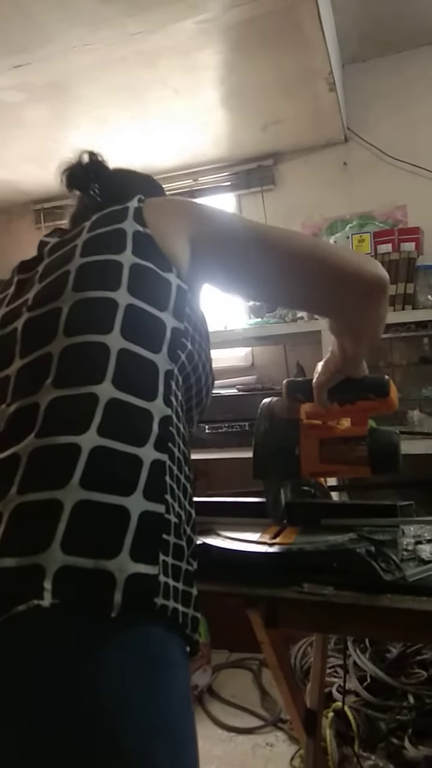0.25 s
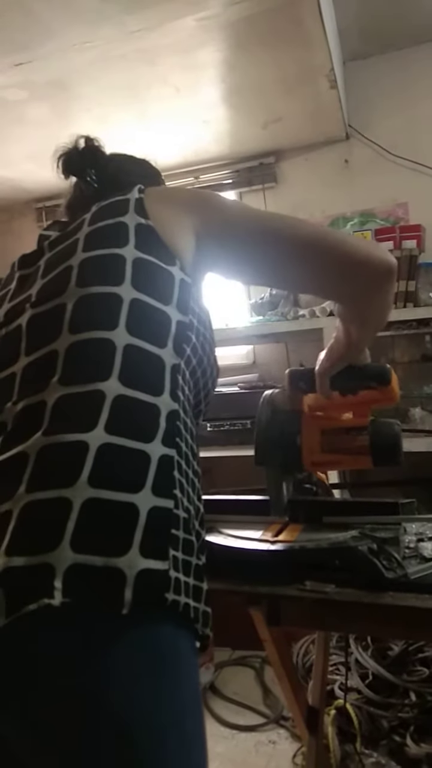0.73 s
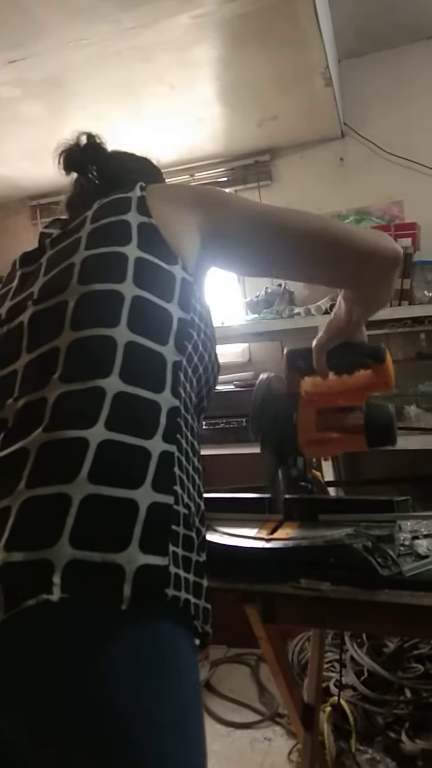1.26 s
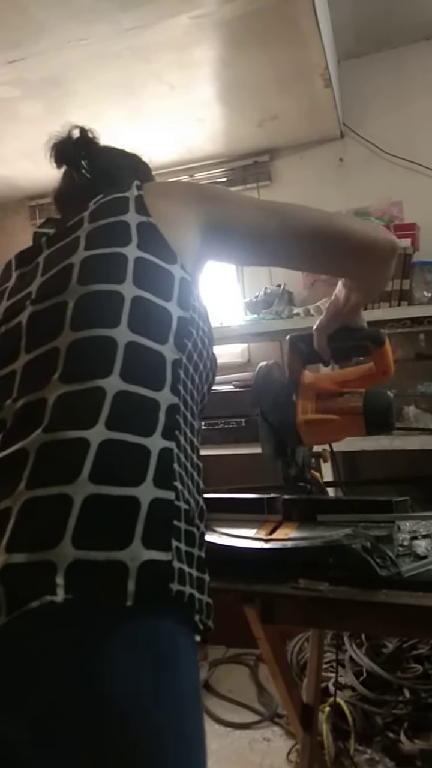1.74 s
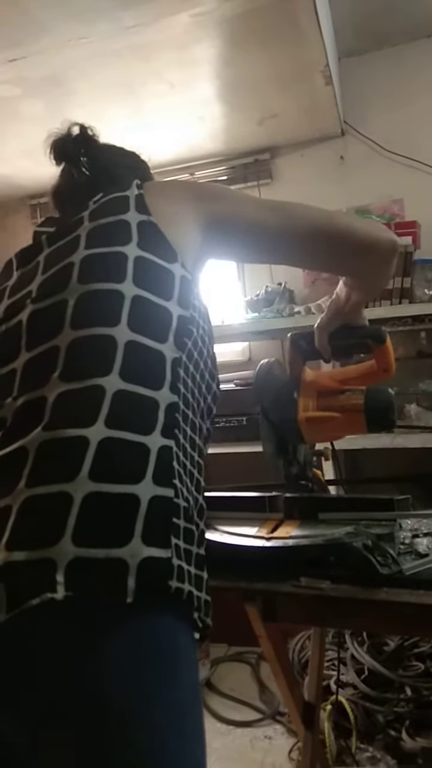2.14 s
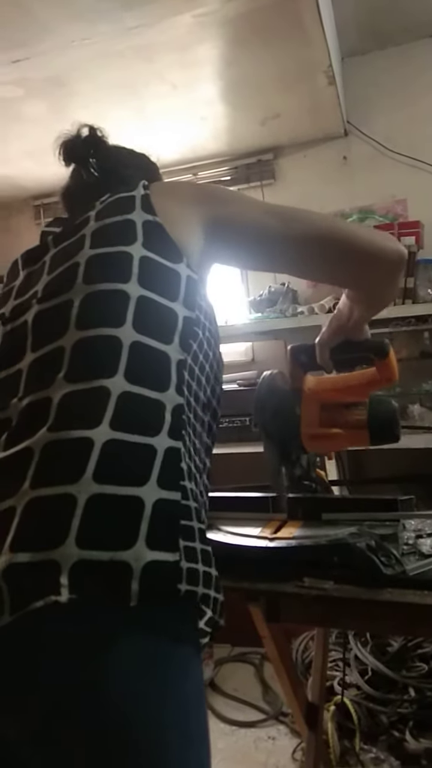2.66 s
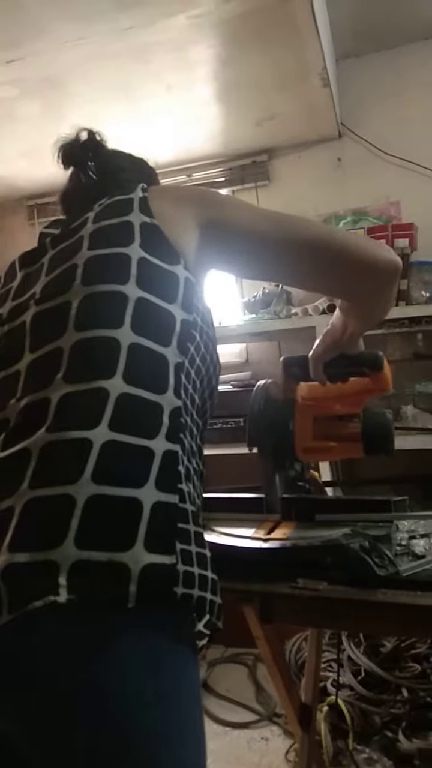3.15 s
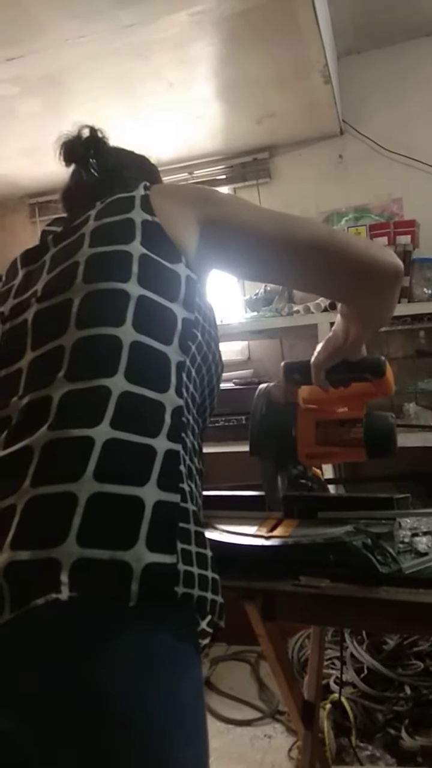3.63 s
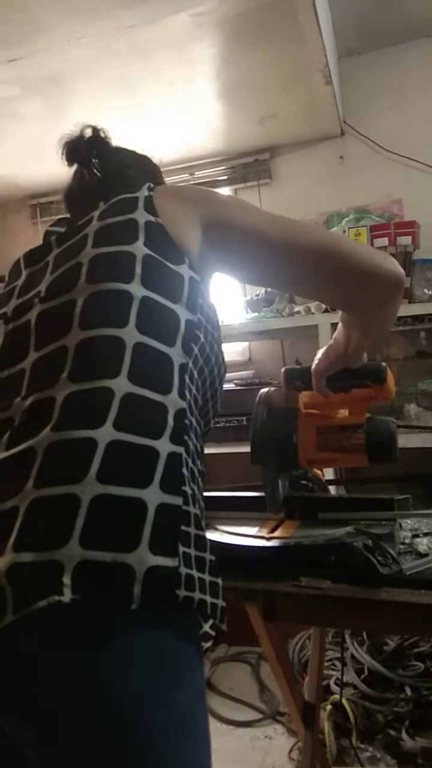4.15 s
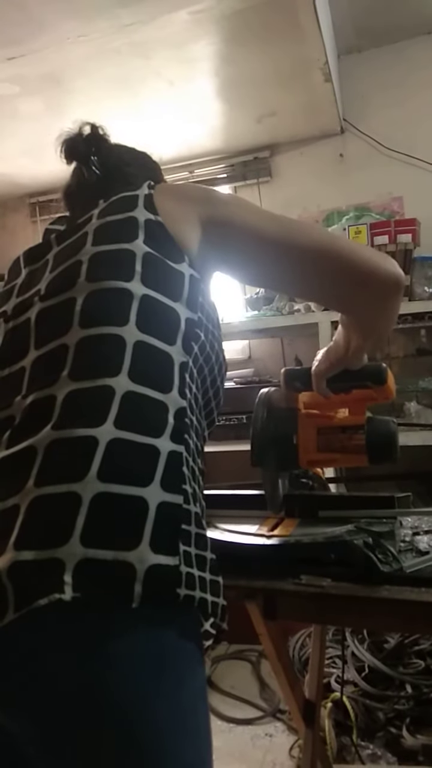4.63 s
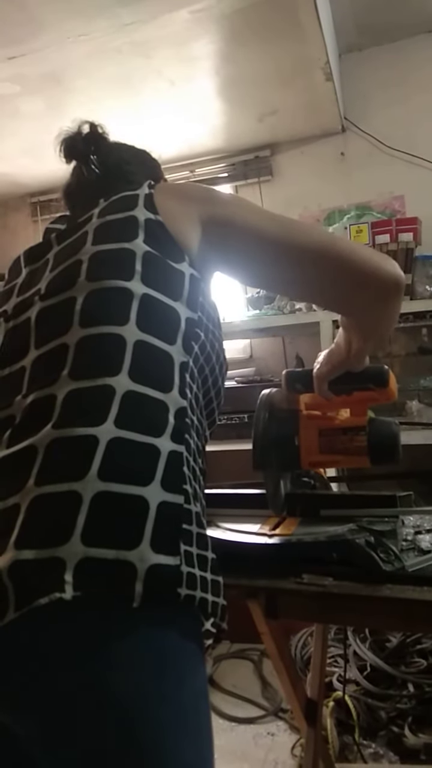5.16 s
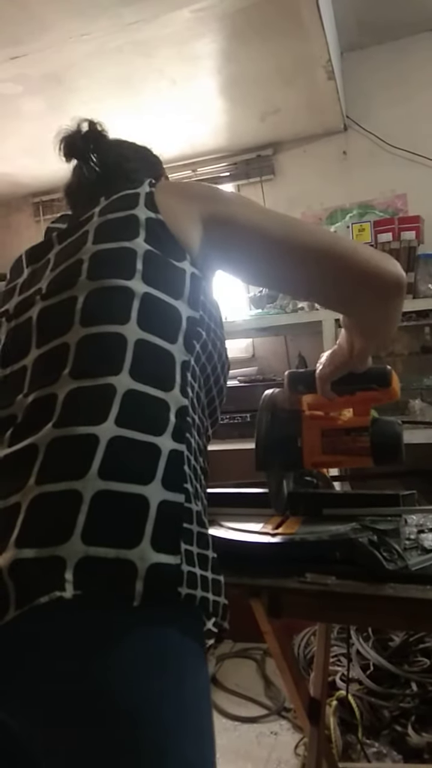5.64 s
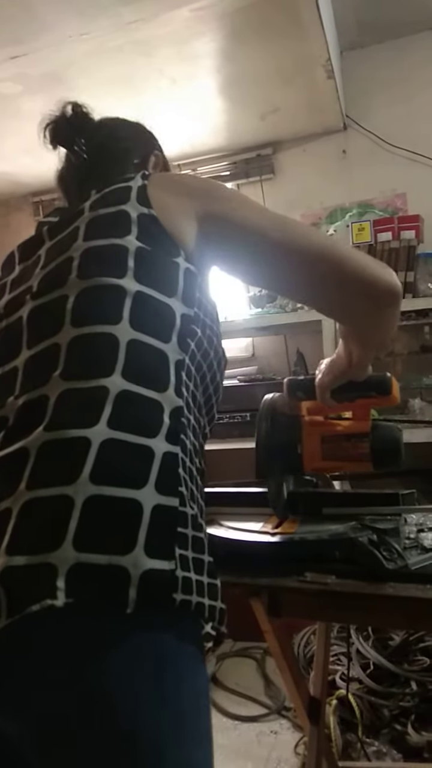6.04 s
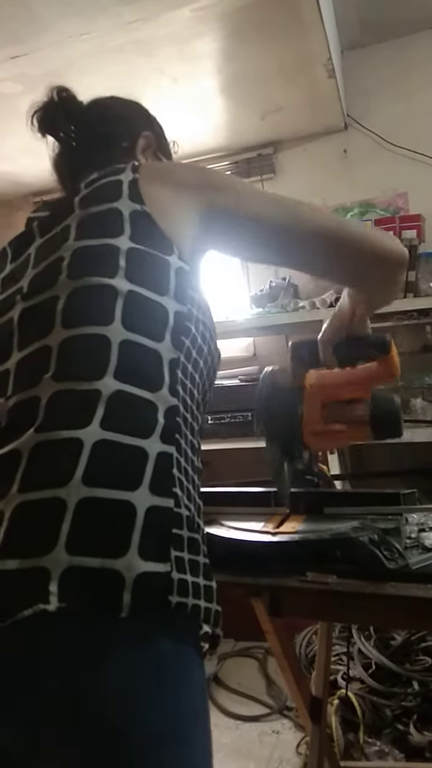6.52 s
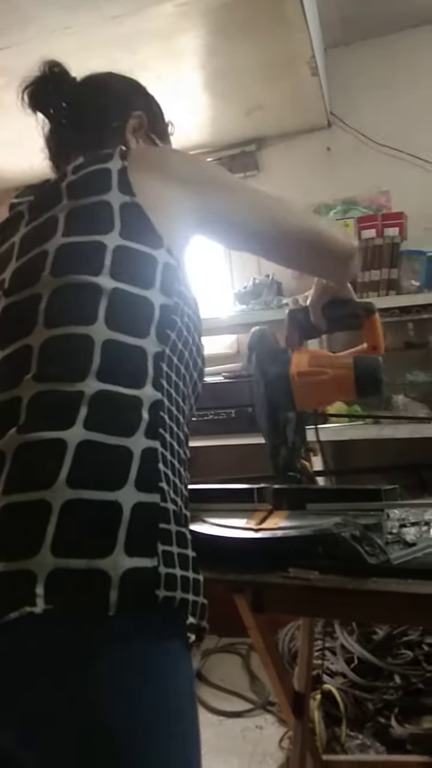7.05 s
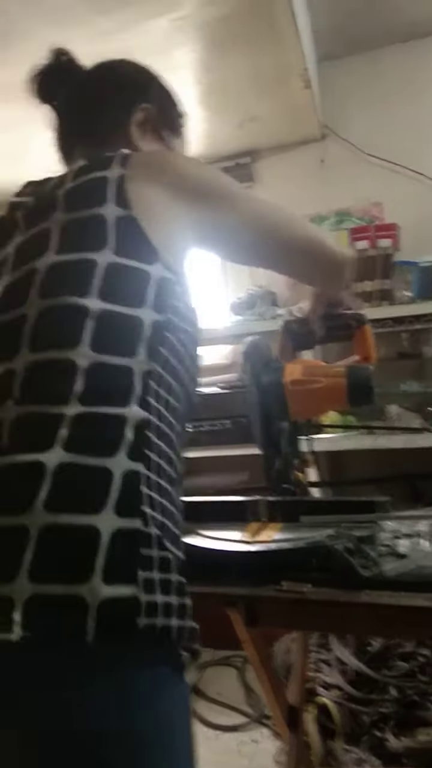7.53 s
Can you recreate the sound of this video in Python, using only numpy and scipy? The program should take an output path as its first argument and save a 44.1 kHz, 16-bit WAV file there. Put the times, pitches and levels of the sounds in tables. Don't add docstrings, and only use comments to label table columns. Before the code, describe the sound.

A dull wavering compressor hum fills a small workshop, with faint handle ticks. A chop saw starts with a hard jolt and rattle, whining rapidly up to a loud, bright, rasping roar that buries the hum. After about three seconds the blade bites in short grinding squeals, the piece knocks and breaks through with a crack; the switch is released and the pitch slides down, ending in guard rattle. Close handheld microphone.

```python
import sys
import numpy as np
from scipy import signal
from scipy.fft import rfft, irfft, next_fast_len
from scipy.io import wavfile
from scipy.ndimage import uniform_filter1d, minimum_filter1d

SR = 44100
rng = np.random.default_rng(int(sys.argv[2]) if len(sys.argv) > 2 else 0)


def master_out(mix):
    frames = np.transpose(np.atleast_2d(mix))
    ceiling = np.clip(frames, -1, 1)
    pcm = np.round(ceiling * 32767).astype(np.int16)
    wavfile.write(sys.argv[1], SR, pcm)


def to_linear_factor(level_db):
    exponent = np.asarray(level_db, float) / 20
    return 10 ** exponent


N = 343098
TIME = np.arange(N) / SR
PADDED = next_fast_len(N + SR // 10)
HZ = np.maximum(np.arange(PADDED // 2 + 1) * SR / PADDED, 1)
START_S, OFF_S = 1.9005, 6.575
FREE_TURNS_PER_S = 494.7
TOP_CUT_HZ = 15510


def rms_one(x):
    return x / np.sqrt(np.mean(x ** 2) + 1e-20)


def in_time(points):
    s, value = np.transpose(points)
    return np.interp(TIME, s, value)


def bell(s, length):
    return np.exp(-np.minimum(.5 * ((TIME - s) / length) ** 2, 30))


def drift(rate):
    knots_per_s = 400
    knots = rng.standard_normal(int(N / SR * knots_per_s) + 900)
    r = np.exp(-2 * np.pi * rate / knots_per_s)
    slow = signal.lfilter([1], [1, -2 * r, r * r], knots)[800:]
    return np.interp(TIME * knots_per_s, np.arange(len(slow)), rms_one(slow))


def colour(points):
    hz, db = np.transpose(points)
    return to_linear_factor(np.interp(np.log(HZ), np.log(hz), db))


def shaped(x, gain):
    return rms_one(irfft(rfft(x, PADDED) * gain, PADDED)[:N])


def resonate(x, hz, width):
    r = np.exp(-np.pi * width / SR)
    poles = [1, -2 * r * np.cos(2 * np.pi * hz / SR), r * r]
    return signal.lfilter(np.array([1, 0, -1]) * (1 - r * r) / 2, poles, x)


def ringing(x, modes):
    return sum(to_linear_factor(db) * rms_one(resonate(x, hz, width)) for hz, width, db in modes)


def contacts(per_s, spread_db):
    sizes = to_linear_factor(spread_db * np.minimum(rng.exponential(1, N), 5)) * rng.choice([-1, 1], N)
    return rms_one(sizes * (rng.random(N) < per_s / SR))


def compressor():
    # pitch_hz, level_db
    hum_lines = [(113.0, -46), (172.3, -44), (226.1, -39), (279.9, -44), (333.8, -44), (398.4, -46),
                 (441.4, -52), (500.6, -56), (554.5, -53), (613.7, -58), (683.7, -60), (721.4, -61)]
    # pitch_hz, level_db (per Hz)
    shop_noise = [(15, -40), (25, -11), (66, 9), (176, -1), (224, -2), (326, -3), (394, -7), (729, -10.5),
                  (1120, -13.5), (1670, -19.5), (4870, -19), (6200, -28.5), (8320, -53), (12100, -70),
                  (15000, -72)]
    # time_s, level_db
    duck = [(0, 0.5), (.9, 0.5), (1.3, 0.5), (1.88, -1), (1.95, -3), (2.45, -9.5), (3.7, -16.5),
            (4.4, -13.5), (6.1, -17.5), (7.78, -11.5)]
    # centre_s, pitch_hz, level_db, length_s
    drone_events = [
        (.65, 68.8, -29, .35),
        (.3, 55, -38, .4),
        (1.5, 52, -39, .22),
        (2.85, 65, -46, .35),
        (4.6, 55, -46, .5),
        (5.7, 55, -50, .4),
        (7.5, 90, -48, .22),
        (7.4, 55, -51, .35),
    ]
    duck_db = in_time(duck)
    uneven = TIME + 0.00031 * drift(3.9)

    def waver(hz, db):
        return to_linear_factor(db + 2.5 * drift(3)) * np.sin(2 * np.pi * hz * uneven)

    lines = sum(waver(hz, db) for hz, db in hum_lines)
    noise = shaped(rng.standard_normal(N), colour(shop_noise))
    drones = sum(bell(s, length) * to_linear_factor(2.0 * drift(26)) * waver(hz, db)
                 for s, hz, db, length in drone_events)
    hum = to_linear_factor(2 + 1.57 * duck_db) * lines
    return drones + hum + to_linear_factor(-37 + duck_db + 1.0 * drift(4.7)) * noise


def squeaks():
    # centre_s, pitch_hz, level_db, length_s
    slips = [
        (.45, 6300, -60, .004),
        (.71, 7000, -68, .003),
        (1.0, 4750, -57, .03),
        (1.4, 1500, -56, .05),
        (1.5, 2600, -59, .07),
        (5.91, 2700, -24, .025),
        (5.912, 1750, -27, .006),
        (6.585, 2920, -20, .02),
    ]
    rough = 0.78 * drift(48)
    return sum(to_linear_factor(db + 4) * bell(s, length) * np.sin(2 * np.pi * hz * TIME + rough)
               for s, hz, db, length in slips)


def knocks():
    # start_s, thump_db, ring_db, clack_db, length_s
    blows = [
        (1.9005, -29, -24, -22, .03),
        (5.452, -48, -44, -23, 0.029),
        (5.761, -39, -44, -30, 0.014),
        (5.883, -35.5, -40, -30, 0.028),
        (6.09, -35, -16.5, -15.5, 0.028),
    ]
    # pitch_hz, width_hz, level_db
    ring_modes = [(460, 42, -12), (880, 63, -4.5)]
    # pitch_hz, width_hz, level_db
    clack_modes = [(1860, 600, 4), (2474, 110, 5.5), (3130, 420, 12), (4400, 650, -23), (6260, 150, -26)]
    crack_cut = signal.butter(4, 7200, fs=SR, output="sos")
    burst = signal.sosfilt(crack_cut, contacts(9000, 2.2))
    table_band = signal.butter(2, [75, 400], "band", fs=SR, output="sos")
    thump = rms_one(signal.sosfilt(table_band, burst))
    ring = ringing(burst, ring_modes)
    clack = to_linear_factor(-11.5) * ringing(burst, clack_modes) + to_linear_factor(-16.5) * rms_one(burst)
    out = 0
    for s, thump_db, ring_db, clack_db, length in blows:
        since = TIME - s
        fade = np.clip(since / .004, 0, 1) * np.exp(-np.clip(since / length, 0, 6) ** 2)
        out = out + fade * (to_linear_factor(thump_db) * thump + to_linear_factor(ring_db) * ring + to_linear_factor(clack_db) * clack)
    return out


def speed():
    # missing_turns_per_s at the start, time_constant_s
    lags = [(226.9, .4315), (197.4, .1218)]
    # time_s, lost_turns_per_s
    load_sag = [(5.06, 0), (5.43, 4.2), (5.8, 4.5), (6.1, 7), (6.575, 2.8)]
    since = np.maximum(TIME - START_S, 0)
    missing = sum(lack * np.exp(-since / lag) for lack, lag in lags)
    driven = FREE_TURNS_PER_S - missing - in_time(load_sag)
    return driven * (1 + .4265 * np.maximum(TIME - OFF_S, 0)) ** -1.2786


def torque_beat(depth):
    beat_hz = 119.8
    pull = np.exp(-np.maximum(TIME - START_S, 0) / .4)
    return 1 + np.clip(depth * pull, 0, 1) * np.cos(2 * np.pi * beat_hz * TIME + 0.83)


def whine():
    # pitch_hz, level_db
    fan_cowl = [(1800, -56), (2550, -8), (3500, -16), (3950, -32), (4400, -23), (4950, -25), (5250, -38),
                (6000, -36)]
    # pitch_hz, width_hz, top_db, beside_db
    stand = (452, 44, -36, -52)
    # time_s, level_db
    slot_whine = [(1.97, -38), (2.03, -17), (2.12, -16.5), (2.6, -18), (3.2, -23.5), (3.56, -17),
                  (3.8, -33.5), (5.0, -27.5), (5.34, -50), (5.48, -24.5), (6.0, -27), (6.22, -21.5),
                  (6.46, -35), (6.68, -23), (6.95, -21), (7.28, -14.5), (7.5, -28), (7.78, -19.5)]
    # pitch_hz, level_db
    slot_octave = [(6000, -42), (9000, -43), (10000, -44), (11000, -54), (12500, -54), (13500, -50),
                   (13900, -48)]
    rate = speed()
    turns = np.cumsum(rate) / SR

    def line(order):
        phase = 2 * np.pi * order * turns + .3 * drift(30)
        return np.sqrt(2) * np.sin(phase) * to_linear_factor(1.5 * drift(12))

    stand_hz, stand_width, top_db, beside_db = stand
    off_peak = (rate - stand_hz) / stand_width * 2
    unbalance = to_linear_factor(beside_db + 1.285 * drift(4.6)) + to_linear_factor(top_db) / (1 + off_peak ** 4)
    out = unbalance * line(1) + to_linear_factor(-47.5) * (rate / 494) ** 4 * line(2)

    breathy = np.clip((TIME - 2.05) / 0.16, 0, 1)
    fan = line(12) * (1 + breathy * (1.8 * drift(60) - .3)) * torque_beat(2.7)
    fan_db = np.interp(12 * rate, *np.transpose(fan_cowl)) + 2.9 * breathy * drift(4.1)
    out += to_linear_factor(fan_db - 17 * (TIME > OFF_S)) * fan

    mesh_peak = 1 / (1 + ((6 * rate - 2200) / 110) ** 2)
    out += to_linear_factor(-35.5) * mesh_peak * line(6)
    out += to_linear_factor(-30) * bell(2.09, 0.031) * line(18) * torque_beat(0.9)

    out += to_linear_factor(in_time(slot_whine) + 1.8 * drift(11)) * line(14) * torque_beat(.9)
    screened_db = -13 * bell(5.8, .35)
    octave_db = np.interp(28 * rate, *np.transpose(slot_octave)) + screened_db + 2.1 * drift(2.6)
    out += to_linear_factor(octave_db) * line(28)
    return out + to_linear_factor(-63) * line(42) * (rate * 42 < TOP_CUT_HZ)


def roar():
    # pitch_hz, level_db (per Hz)
    roar_colour = [(90, -2.5), (394, -12.5), (487, -16), (1130, -13), (2400, -13), (2580, -7.5),
                   (4400, -5.5), (4700, -5.5), (6000, -7), (6200, -6), (7400, -12.5), (8580, -27.5),
                   (9950, -24), (12300, -38)]
    # pitch_hz, width_hz, level_db
    base_plate = [(574, 12, -21), (866, 16, -27)]
    # pitch_hz, width_hz, level_db
    housing = [(1113, 80, -27), (2740, 190, -48), (2961, 130, -30), (3280, 540, -17), (3600, 300, -20),
               (4840, 300, -14.5), (5153, 340, -9.5), (5450, 140, -15.5), (5790, 35, -16.5),
               (14500, 1300, -0.5)]
    zone_edges = (450, 2400, 8000, 11500)
    # time_s, level_db
    loudness = [(1.9, -17.5), (2.01, -13.5), (2.13, -10), (2.42, -12.5), (2.6, -13.5), (3.55, -14),
                (4.14, -14.5), (4.63, -14), (5.12, -12.5), (5.47, -15), (5.8, -17), (6.39, -17),
                (6.62, -16.5), (6.9, -16), (7.3, -16.5), (7.78, -15.5)]
    drive = contacts(12000, 1.95) * to_linear_factor(0.21 * drift(56)) * torque_beat(0.46)
    drive = drive + ringing(drive, base_plate + housing)
    gain = colour(roar_colour) / (1 + (120 / HZ) ** 4)
    below = [0] + [1 / (1 + (HZ / edge) ** 8) for edge in zone_edges] + [1]

    def jolt(db, lag_s):
        return to_linear_factor(db) * np.exp(-np.maximum(TIME - START_S - .01, 0) / lag_s)

    body = to_linear_factor(in_time(loudness))
    frame = to_linear_factor(-41) * body + jolt(-15, 0.084)
    guard = to_linear_factor(-11) * body + jolt(-16.5, .12)
    air = to_linear_factor(-20) * body * (speed() / FREE_TURNS_PER_S) ** 2.2
    top = to_linear_factor(-10.5) * air + to_linear_factor(-38) * body
    out = 0
    for low, high, strength in zip(below, below[1:], (frame, guard, body, air, top)):
        zone = shaped(drive, gain * np.sqrt(high - low))
        out = out + strength * to_linear_factor(-2.0 + 0.89 * drift(2.7)) * zone
    return out


def rattle():
    # pitch_hz, width_hz, level_db
    guard_modes = [(470, 30, -20), (820, 20, -19), (1640, 24, -2), (1780, 50, 3), (3300, 260, -1)]
    # pitch_hz, width_hz, level_db
    pivot_modes = [(1205, 16, -5)]
    # centre_s, level_db, length_s
    pivot_buzz = [
        (1.948, -16.5, 0.018),
        (2.08, -18.5, .04),
        (2.2, -26, 0.088),
        (7.66, -30, 0.18),
    ]
    slack = np.maximum(TIME - 7.105, 0)
    sheet = to_linear_factor(-33) * bell(START_S, 0.4) + to_linear_factor(-42 + 23.5 * slack) * np.clip(slack / 0.32, 0, 1)
    pivot = sum(to_linear_factor(db) * bell(s, length) for s, db, length in pivot_buzz)
    dull = signal.butter(6, 3400, fs=SR, output="sos")
    backlash = signal.sosfilt(dull, contacts(7000, 2.5))
    return sheet * to_linear_factor(-0.5) * ringing(backlash, guard_modes) + pivot * ringing(backlash, pivot_modes)


def cut():
    # start_s, length_s, grind_db, low_squeal_db, top_squeal_db
    bites = [
        (5.082, 0.11, -36, -37, -40),
        (5.19, .12, -35, -26, -38),
        (5.324, 0.12, -33.5, -33, -30),
        (5.436, 0.036, -34, -45, -34),
        (5.547, 0.13, -38, -40, -29),
        (5.755, 0.032, -31.5, -38, -19.5),
        (5.863, 0.055, -33.5, -34, -21),
        (5.916, 0.058, -38, -30, -35),
        (6.038, .07, -30, -35, -37),
    ]
    # time_s, pitch_hz
    low_squeal = [(5.08, 7860), (5.2, 7790), (5.45, 7745), (6.12, 7700)]
    # pitch_hz, level_db (per Hz)
    grind_colour = [(2000, -6), (2700, 15.5), (5000, 19), (7600, 11.5), (9000, -4.5), (12500, -5),
                    (15000, 3), (15600, -5)]

    def held(s, length):
        attack = np.clip((TIME - s) / 0.018, 0, 1)
        return attack * np.exp(-np.clip((TIME - s - length) / 0.034, 0, 30))

    grind, low, top = sum(held(s, length) * to_linear_factor(np.array(db))[:, None] for s, length, *db in bites)
    grind = grind + to_linear_factor(-48) * held(bites[0][0], bites[-1][0] - bites[0][0])
    teeth = contacts(14000, 1.8)
    middle_hz, middle_width = 11570, 50.
    middle = resonate(resonate(teeth, middle_hz, middle_width), middle_hz, middle_width)
    middle = rms_one(middle) * (TIME > 5.92)
    phase = 2 * np.pi * np.cumsum(in_time(low_squeal)) / SR
    squeal = low * (np.sin(phase + .8 * drift(46)) * to_linear_factor(2.6 * drift(33)) + to_linear_factor(-14) * middle)
    squeal += top * np.sin(2 * phase + .7 * drift(60)) * to_linear_factor(3.5 * drift(35))
    return squeal + grind * to_linear_factor(11.0 + 2.2 * drift(38)) * shaped(teeth, colour(grind_colour))


def workshop(x):
    t60_s, room_db = .33, -12.5
    t = np.arange(int(.5 * SR)) / SR
    echo = rng.standard_normal(len(t)) * to_linear_factor(-60 * t / t60_s) * (t > .004)
    echo = signal.lfilter([1], [1, -.3], echo)
    return x + to_linear_factor(room_db) * signal.fftconvolve(x, echo / np.sqrt(np.sum(echo ** 2)))[:N]


def scene():
    switched_on = np.clip((TIME - START_S) / .001, 0, 1)
    saw = (whine() + roar() + rattle()) * switched_on + cut() + knocks() + squeaks()
    return np.tile(workshop(saw) + compressor(), (2, 1))


def top_cut(x):
    return signal.sosfilt(signal.butter(12, 16290, fs=SR, output="sos"), x)


def record(dry):
    room_left = np.minimum(1, 0.82 / (np.abs(dry) + 1e-9))
    gain = uniform_filter1d(minimum_filter1d(room_left, size=129), size=129)
    low_pass = signal.ellip(10, .3, 80, TOP_CUT_HZ, fs=SR, output="sos")
    return top_cut(signal.sosfilt(low_pass, dry * gain))


dry = scene()
out = record(dry)
master_out(out)
```